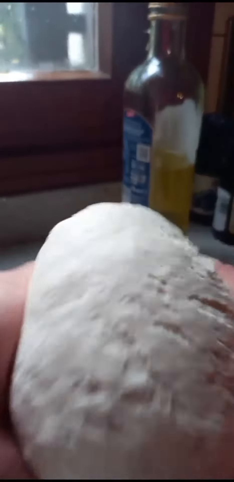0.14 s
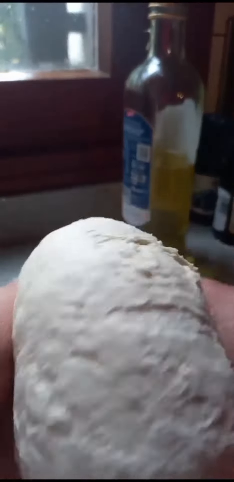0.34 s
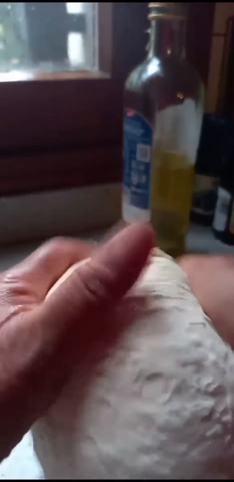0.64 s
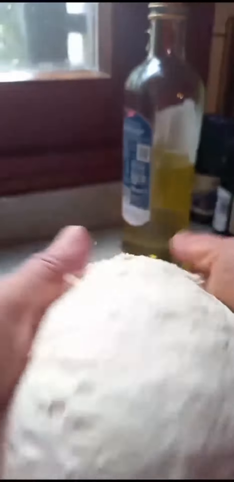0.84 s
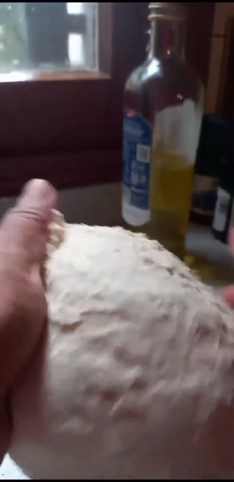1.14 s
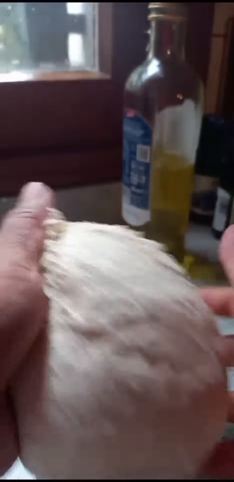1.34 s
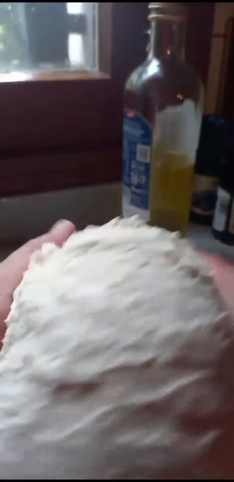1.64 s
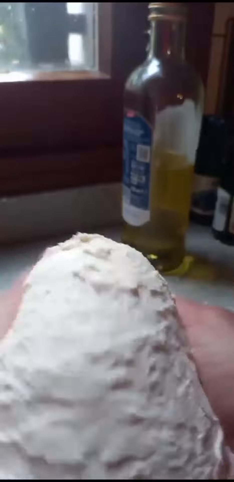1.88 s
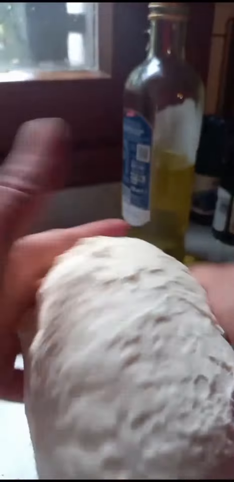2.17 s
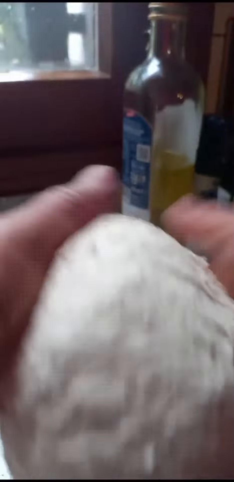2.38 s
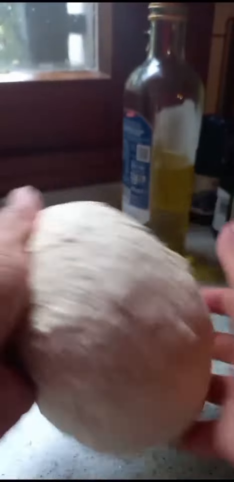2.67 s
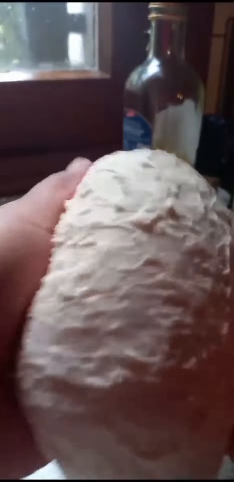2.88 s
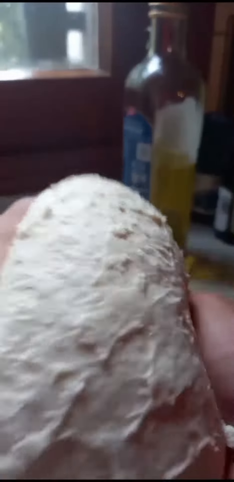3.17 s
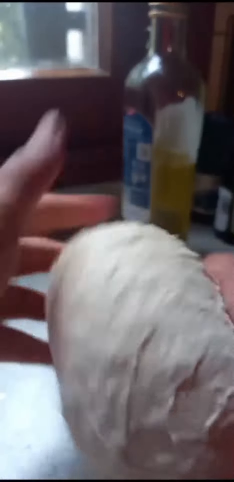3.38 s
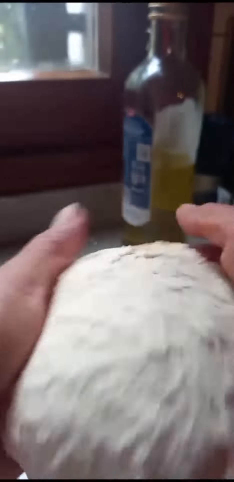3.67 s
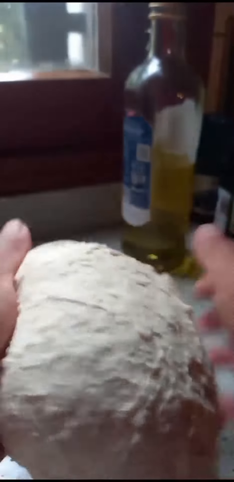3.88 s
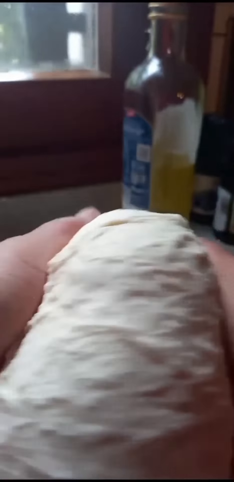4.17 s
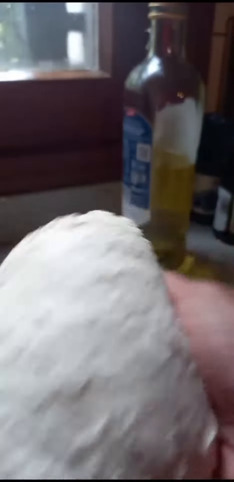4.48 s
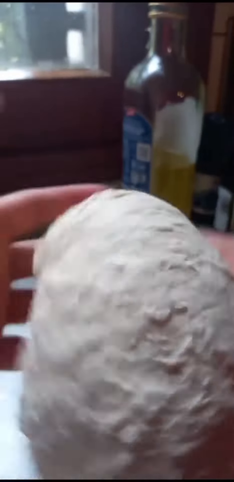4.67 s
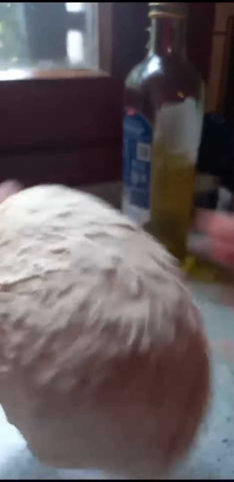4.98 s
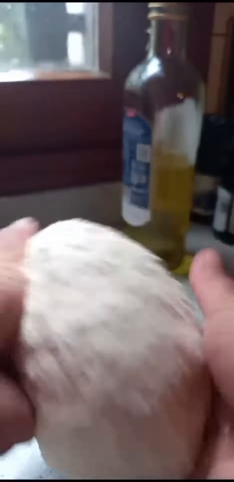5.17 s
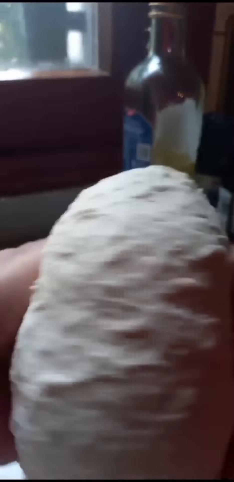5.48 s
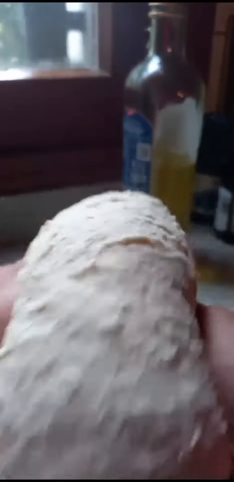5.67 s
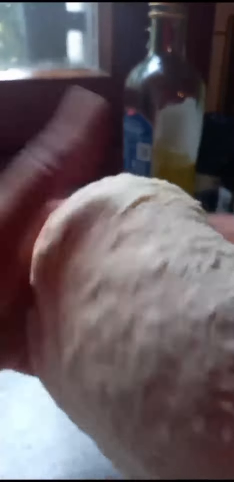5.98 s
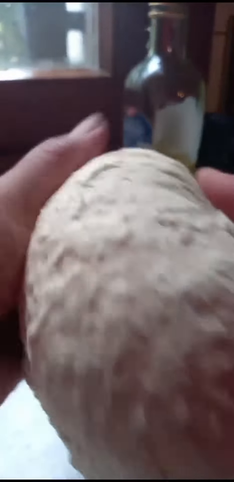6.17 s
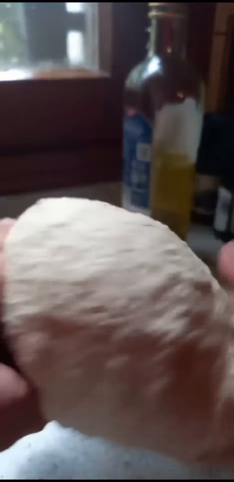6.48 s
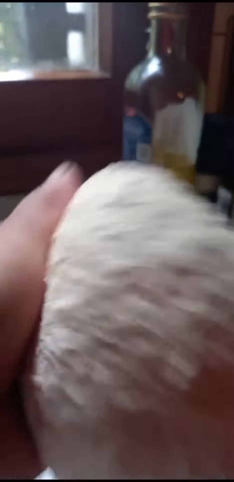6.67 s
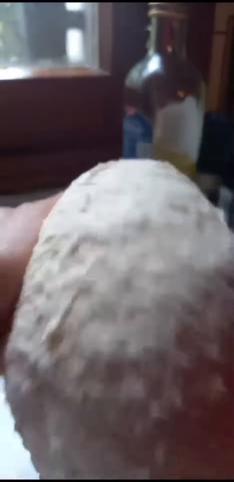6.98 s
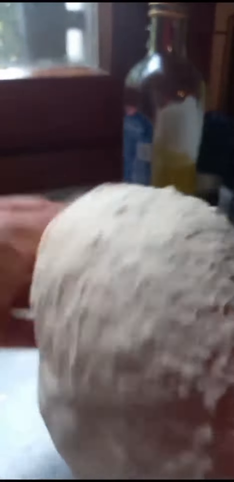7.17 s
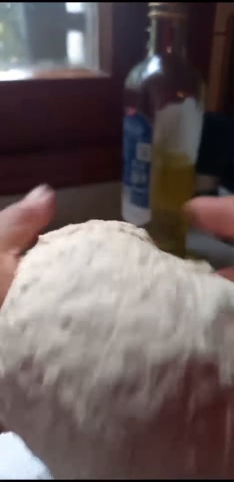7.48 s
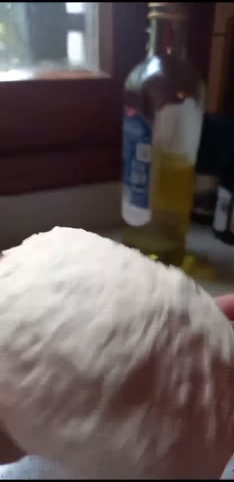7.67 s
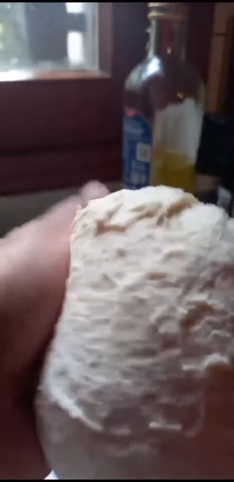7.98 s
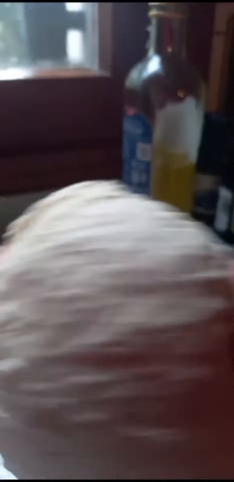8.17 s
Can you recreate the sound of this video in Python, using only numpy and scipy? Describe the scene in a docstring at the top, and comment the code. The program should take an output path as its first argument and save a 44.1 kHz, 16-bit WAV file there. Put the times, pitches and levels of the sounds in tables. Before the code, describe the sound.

Dough is patted and turned by hand in a small kitchen, making dull thumps, skin rubbing and moist little clicks.

```python
"""A small kitchen, close to the counter, where two hands turn and round a ball of dough.
Pats and pushes excite the modes of the hollow counter, which booms. Friction makes floury palms swish
and the twisting dough groan; sticky spots let go with ticks and rasps, and trapped air escapes in
an occasional smack. The room reverberates briefly over a quiet hiss, faint whines and a soft rush."""
import sys
import numpy as np
from scipy import signal
from scipy.fft import rfft, irfft
from scipy.io import wavfile
from scipy.ndimage import uniform_filter1d

SR = 44100
rng = np.random.default_rng(int(sys.argv[2]) if len(sys.argv) > 2 else 0)


def wav_out(sig):
    """Save sig, one row per channel (or a flat mono array), as 16-bit PCM at SR to the path in sys.argv[1]."""
    wavfile.write(sys.argv[1], SR, np.round(np.clip(np.atleast_2d(sig).T, -1, 1) * 32767).astype(np.int16))


N = 367779
TIME = np.arange(N) / SR


def gain_of(db):
    """Amplitude ratio of a level in decibels."""
    return 10 ** (np.asarray(db) / 20)

def unit_rms(x):
    """Normalisation to an overall rms of 1."""
    return x / np.sqrt(np.mean(x ** 2) + 1e-20)

def smoothed(x, size):
    """Low-pass filtering by two moving averages of size samples."""
    return uniform_filter1d(uniform_filter1d(x, size), size)

def steadied(x, size=3000):
    """Normalisation to a running rms of 1, which keeps the fast flutter."""
    return x / np.sqrt(abs(smoothed(x ** 2, size)) + 1e-20)

def curve_at(points, hz):
    """Interpolation on a log-frequency axis."""
    f, value = np.transpose(points)
    return np.interp(np.log(hz + 1), np.log(f), value)

def add(mix, s, sound):
    """Superposition of a sound on the mix, from time s."""
    part = mix[max(round(s * SR), 0):][:len(sound)]
    part += sound[:len(part)]

def through(x, response):
    """Convolution, cut to the length of the input."""
    return signal.oaconvolve(x, response)[:len(x)]

def pulse(spectrum, tilt_db=0, size=4096):
    """Minimum-phase pulse of unit energy, its spectrum tilted by tilt_db per octave."""
    hz = abs(np.fft.fftfreq(size, 1 / SR))
    db = curve_at(spectrum, hz) + tilt_db * np.log2(np.maximum(hz, 130) / 1000)
    log_gain = np.log(gain_of(np.maximum(db, -100)))
    shape = np.fft.ifft(np.exp(np.conj(signal.hilbert(log_gain)))).real[:size // 2]
    return shape / np.linalg.norm(shape)

def ring(modes, rise_s):
    """Free vibration: damped modes (f/Hz, level/dB, T60/s) with a gradual onset."""
    t = TIME[:SR // 2]
    partials = (gain_of(db - 60 * t / t60) * np.sin(2 * np.pi * hz * t) for hz, db, t60 in modes)
    return (1 - np.exp(-t / rise_s)) * sum(partials)

def grains(per_s, spread_db):
    """Shot noise: a random train of tiny slips of uneven size."""
    size = gain_of(spread_db * np.minimum(rng.exponential(1, N), 5))
    return unit_rms(size * rng.standard_normal(N) * (rng.random(N) < per_s / SR))

def burst(decay_s, size=600):
    """Finite contact time smears a click into a short burst with a nearly flat spectrum."""
    smear = rng.standard_normal(size) * np.exp(-TIME[:size] / decay_s)
    phase = np.angle(rfft(smear, 4 * size))
    return irfft(np.exp(1j * phase))[:size] * np.exp(-TIME[:size] / (4 * decay_s))

def swell(s, db, rise_s, fall_s, roundness):
    """Envelope peaking at s, 18.5 dB down rise_s before and fall_s after; roundness 1 is pointed."""
    away = np.maximum((s - TIME) / rise_s, (TIME - s) / fall_s)
    return gain_of(db - 18.5 * away ** roundness) * (away < 3)

def swells(rows, roundness, resting_db=-np.inf):
    """Incoherent addition: swells add their power to a resting level."""
    return np.sqrt(gain_of(resting_db) ** 2 + sum(swell(*row, roundness) ** 2 for row in rows))

def wavering(hz, width_hz):
    """Narrow-band noise: a fuzzy tone of rms 1 around a steady or moving pitch."""
    lowpass = signal.butter(2, width_hz / 2, fs=SR, output="sos")
    waver = signal.sosfilt(lowpass, rng.standard_normal(N) + 1j * rng.standard_normal(N))
    carrier = np.exp(2j * np.pi * np.cumsum(hz * np.ones(N)) / SR)
    return unit_rms((waver * carrier).real)


# Reverberation time of the kitchen: f/Hz, T60/s
REVERB_TIMES = [(100, 0.37), (400, 0.42), (1000, 0.53), (3000, 0.28), (8000, 0.18), (14000, 0.056)]
# Early reflections from counter, wall and window: delay/s, relative amplitude
REFLECTIONS = [(.0021, 0.81), (.0058, 0.29), (.0096, 0.22), (0.0162, 0.18)]
def kitchen(wet_db, echo_share):
    """Room impulse response: direct sound, reflections and a diffuse tail, shortest in the treble."""
    hz, t, noise = signal.stft(rng.standard_normal(SR // 2), SR, nperseg=256)
    decay = gain_of(-60 * t / curve_at(REVERB_TIMES, hz)[:, None])
    tail = signal.istft(noise * decay, SR, nperseg=256)[1][:SR // 2]
    tail *= 1 - np.exp(-TIME[:len(tail)] / 0.0003)
    response = gain_of(wet_db) * tail / np.linalg.norm(tail)
    response[0] += 1
    for delay, gain in REFLECTIONS:
        add(response, delay, [echo_share * gain])
    return response


# Modes of the hollow counter: f/Hz, relative level/dB, T60/s
COUNTER_MODES = [(102, -2, .33), (130, -7, .22), (151, -3, .26), (190, -6, .26), (233, -2, .3),
                 (274, -4, .32), (338, -5, .28), (362, 0, .3), (388, -2, .28), (428, -2, .3)]
def counter(ring_db, wet_db):
    """Resonance: an impulse on the counter excites its modes as well as the room."""
    return kitchen(wet_db, echo_share=0.14) + gain_of(ring_db) * ring(COUNTER_MODES, rise_s=0.00048)


# Spectrum of the hiss: f/Hz, relative level/dB
HISS_SPECTRUM = [(30, -1), (55, -0.5), (103, 0.5), (180, -7), (350, -2), (520, -12), (1100, -19.5),
                 (2000, -23), (2650, -20), (3500, -23), (5000, -25), (8600, -30.5), (10000, -27.5),
                 (14000, -23)]
def hiss():
    """Stationary broadband noise is heard as a quiet, even hiss."""
    return gain_of(-56) * unit_rms(through(rng.standard_normal(N), pulse(HISS_SPECTRUM)))


# Faint whines: start/s, end/s, f/Hz, bandwidth/Hz, level/dB
WHINE_BANDS = [(0, 2.6, 2772, 28, -77), (1.8, 2.9, 3333, 28, -79), (5.8, 6.9, 3320, 28, -79)]
def whines():
    """Noise confined to a narrow band is heard as a thin pitch; each fades in and out."""
    out = np.zeros(N)
    for start, end, hz, width_hz, db in WHINE_BANDS:
        whine = wavering(hz, width_hz)[:round((end - start) * SR)]
        add(out, start, gain_of(db) * whine * signal.windows.tukey(len(whine), .2))
    return out


# Soft pats: t/s, relative level/dB, tilt/(dB/octave), knock f/Hz, knock level/dB
PAT_EVENTS = [(.008, -20, 3, 406, -46), (.057, -21.5, 1.5, 440, -21.5), (.632, -27.5, 2.5, 378.3, -28),
              (1.165, -36.5, 0.5, 393, -57), (2.338, -14, 1.5, 369.6, -17), (2.439, -27, -7, 360, -31),
              (3.352, -21.5, 3.5, 410.4, -22.5), (4.751, -22, 2.5, 406, -24), (4.852, -26.5, -6, 344, -41),
              (5.794, -21, 6.5, 427, -28.5), (5.903, -28.5, -3, 374.7, -27), (6.044, -28, 3, 362, -33),
              (6.513, -22, -6, 290, -41), (6.577, -13, -4.5, 297, -30), (6.59, -16.5, -3.5, 388, -33)]
# Spectra of a soft palm's force and of its skin settling on dough: f/Hz, relative level/dB
PALM_SPECTRUM = [(30, -15), (75, -22), (105, -9.5), (140, 8), (250, -1.5), (425, -1), (490, -14),
                 (860, -16.5), (980, -31), (1600, -12), (3000, -67), (8000, -102)]
SKIN_SPECTRUM = [(300, -18), (600, 4), (900, 9.5), (1200, -7), (2000, -7.5), (5000, -24)]
def pats():
    """Impact excitation: a palm thumps and rustles, the counter booms, the board on it knocks."""
    out, contact = np.zeros(N), np.zeros(N)
    flesh = signal.windows.hann(55)  # soft contact is a low-pass filter
    thump_hz, lead_s = 248, .006
    phase_squared = (np.pi * thump_hz * (TIME[:round(2 * lead_s * SR)] - lead_s)) ** 2
    thump = gain_of(-0.5) * (1 - 2 * phase_squared) * np.exp(-phase_squared)  # the shove, heard directly
    t = TIME[:SR // 2]
    settling = (1 - np.exp(-t / 0.0047)) * np.exp(-t / 0.049)
    for s, db, tilt_db, knock_hz, knock_db in PAT_EVENTS:
        boom = through(counter(ring_db=-43.5, wet_db=5.5), pulse(PALM_SPECTRUM, tilt_db))
        boom = through(boom, flesh)
        boom *= gain_of(db + 23) / np.linalg.norm(boom)
        knock = ring([(knock_hz, 0, 0.19)], rise_s=0.0044)
        add(out, s - .008, gain_of(-19) * boom)  # the fingers arrive first
        add(out, s - lead_s, gain_of(db) * thump)
        add(out, s, boom)
        add(out, s + 0.00799, gain_of(knock_db) * knock)
        add(contact, s, gain_of(db - 37.5 + 2.1 * tilt_db) * settling)  # a brighter pat rustles more
    rustle = steadied(through(grains(per_s=4000, spread_db=2), pulse(SKIN_SPECTRUM)), size=600)
    return out + contact * rustle


# Pushes: peak t/s, relative boom level/dB, relative judder level/dB, rise/s, fall/s
PUSH_EVENTS = [(0.019, -26.5, -34.5, 0.3, 0.035), (.11, -32, -38, 0.15, 0.17), (.26, -59, -42, 0.11, 0.27),
               (.43, -41, -47, 0.089, 0.064), (.55, -53, -42, 0.14, 0.043), (.685, -39, -64, 0.051, 0.088),
               (.98, -47, -53, 0.49, 0.17), (1.36, -52.5, -45, 0.16, 0.21),
               (1.567, -37.5, -31.5, 0.078, 0.12), (1.725, -37, -33, 0.073, 0.14),
               (1.935, -46.5, -36.5, 0.1, 0.07), (2.015, -41, -37, 0.074, 0.12),
               (2.45, -30, -27.5, 0.15, 0.12), (2.55, -50, -38, 0.065, 0.18),
               (2.82, -50, -45.5, 0.038, 0.053), (3.03, -45, -42.5, 0.054, 0.16),
               (3.17, -39.5, -59, 0.095, 0.065), (3.42, -34, -43.5, 0.11, 0.11),
               (3.82, -46.5, -72, 0.14, 0.076), (4.3, -52, -67, 0.042, 0.12), (4.62, -42, -44, 0.12, 0.14),
               (4.88, -41, -36, 0.13, 0.14), (4.99, -38, -46, 0.063, 0.11), (5.32, -42, -61, 0.064, 0.21),
               (5.92, -33, -44.5, 0.17, 0.15), (6.08, -30, -38.5, 0.046, 0.094),
               (6.23, -31.5, -39.5, 0.06, 0.12), (6.309, -31, -40.5, 0.18, 0.16),
               (6.592, -26.5, -33.5, 0.082, .068), (6.669, -26, -34.5, 0.097, 0.14),
               (6.91, -45.5, -50.5, 0.27, 0.2), (7.11, -43, -48, 0.13, 0.058),
               (7.23, -42.5, -57, 0.056, 0.087), (7.47, -45.5, -60, 0.39, 0.57),
               (8.33, -44.5, -52.5, 0.11, 0.12)]
# Spectra of dough juddering, dough slipping and skin scuffing: f/Hz, relative level/dB
JUDDER_SPECTRUM = [(25, -13), (48, -23.5), (75, -17), (102, -2.5), (120, -7), (160, -23.5), (200, -19.5),
                   (500, -65.5)]
SLIP_SPECTRUM = [(60, -54.5), (105, -13), (135, -2.5), (200, 6), (360, 1), (425, -0.5), (480, -7.5),
                 (800, -23), (1050, -37.5), (3000, -46)]
SCUFF_SPECTRUM = [(250, -26), (520, -1.5), (850, -10), (1050, -12), (1800, -10), (4000, -54)]
def pushes(roundness=1.37):
    """Stick-slip friction: pushed dough judders and keeps the counter ringing while skin scuffs it."""
    judder = steadied(through(grains(per_s=300, spread_db=1), pulse(JUDDER_SPECTRUM)), size=1600)
    slips = through(grains(per_s=300, spread_db=2), pulse(SLIP_SPECTRUM))
    boom = steadied(through(slips, counter(ring_db=-45.5, wet_db=-1.5)), size=1800)
    scuff = steadied(through(grains(per_s=1100, spread_db=0), pulse(SCUFF_SPECTRUM)))
    # Between pushes the dough still rolls a little, unevenly.
    wander_db = 0.5 * unit_rms(smoothed(rng.standard_normal(N), size=2500))
    times, boom_db, judder_db, rises, falls = zip(*PUSH_EVENTS)
    weight = swells(zip(times, judder_db, rises, falls), roundness, resting_db=-60.5 + wander_db)
    force = swells(zip(times, boom_db, rises, falls), roundness, resting_db=-57 + wander_db)
    scuffing = force ** 0.52  # a heavy hand muffles the skin, so the scuff grows more slowly
    return gain_of(1) * judder * weight + gain_of(-1) * boom * force + gain_of(-46) * scuff * scuffing


def crackle(per_s, decay_cycles, pitches=16):
    """Damped oscillators: tiny blisters burst in the sticky dough, each ringing at its own pitch."""
    t, out = TIME[:500], np.zeros(N)
    for hz in np.geomspace(1900, 4600, pitches):
        blister = np.exp(-t * hz / decay_cycles) * np.sin(2 * np.pi * hz * t)
        out += unit_rms(through(grains(per_s / pitches, spread_db=-1), blister))
    return unit_rms(out)


def catches(per_s=45, decay_s=.012, depth=.3):
    """Amplitude modulation by stick-slip: skin catches, then tears free with a jerk."""
    onsets = 1. * (rng.random(N) < per_s / SR)
    jerks = through(onsets, np.exp(-TIME[:4000] / decay_s))
    return steadied(1 + depth * unit_rms(jerks - jerks.mean()), size=4000)


# Hand sliding over dough: peak t/s, level/dB, rise/s, fall/s, grip (0 floury to 1 tacky)
SLIDE_EVENTS = [(.425, -49.5, 0.17, 0.12, 0.37), (.535, -54, 0.058, 0.032, 0.24),
                (.965, -47, 0.14, 0.18, 0.23), (1.178, -48, 0.027, 0.045, .1),
                (1.52, -57, 0.11, 0.1, 0.039), (1.8, -45, 0.045, 0.085, 0.32),
                (1.966, -43, 0.1, 0.08, 0.27), (2.15, -51, 0.063, 0.047, 0.57),
                (2.495, -36, 0.073, 0.054, 0.12), (2.549, -43.5, 0.081, 0.057, 1),
                (2.905, -55, 0.24, 0.16, 0.059), (3.095, -53, 0.052, 0.065, .7),
                (3.18, -44.5, 0.067, 0.082, 0.31), (3.555, -53.5, 0.037, 0.052, 0.025),
                (3.791, -46, 0.18, 0.075, 0.04), (3.839, -41, 0.12, 0.055, 0.32),
                (4.14, -51.5, 0.1, 0.082, 0.028), (4.355, -51.5, 0.084, 0.15, 0.15),
                (4.505, -45, 0.037, 0.29, 0.24), (4.699, -41.5, 0.048, 0.026, 0.32),
                (4.935, -37.5, .11, 0.12, 0.2), (5.004, -43.5, 0.077, 0.035, 0.98),
                (5.334, -46, 0.056, 0.12, 0.11), (5.56, -52.5, 0.082, 0.12, 0.071),
                (5.674, -51.5, 0.088, 0.59, 0.26), (5.945, -43, 0.057, 0.05, 0.17),
                (6.03, -48, 0.063, 0.052, 0.041), (6.27, -47, 0.32, 0.16, 0.14),
                (6.325, -37, 0.031, 0.025, 0.26), (6.37, -41, 0.035, 0.047, 0.47),
                (6.595, -49, 0.016, 0.049, 0.029), (6.69, -54.5, 0.044, 0.5, 0.11),
                (7.105, -42.5, 0.13, 0.1, 0.11), (7.4, -50.5, 0.097, 0.31, 0.05),
                (7.565, -44, 0.099, 0.12, 0.18), (7.638, -50, 0.022, 0.04, 0.97),
                (7.971, -56, 0.2, 0.46, 0.11), (8.31, -48, 0.084, 0.069, 0.54)]
# Friction spectra of a light and of a firm touch: f/Hz, relative level/dB
BRUSH_SPECTRUM = [(710, -57), (1200, -10), (2050, -10.5), (2340, -6.5), (3420, -4.5), (4210, -13),
                  (4910, -5.5), (6340, -6), (12600, 3.5), (14000, 3.5)]
RUB_SPECTRUM = [(350, 2), (600, 2.5), (903, 4.5), (1070, -11.5), (1180, -1), (1430, -5.5), (1700, 3),
                (2040, -0.5), (2880, -3), (5640, -2), (8710, -9), (9680, 1), (12800, -3.5), (14000, -2)]
def slides():
    """Friction noise: skin hisses finely over flour; on a tacky patch it turns fuller and crackles."""
    powers = np.array([swell(*row[:4], roundness=1.275) for row in SLIDE_EVENTS]) ** 2
    total_power = powers.sum(0) + gain_of(-85) ** 2  # the hands never quite leave the dough
    grip = np.clip([row[-1] for row in SLIDE_EVENTS], 0, 1) @ powers / total_power
    light = unit_rms(through(grains(per_s=20000, spread_db=2.5), pulse(BRUSH_SPECTRUM)))
    firm = unit_rms(through(grains(per_s=6000, spread_db=1.1), pulse(RUB_SPECTRUM)))
    firm += gain_of(-9) * crackle(per_s=730, decay_cycles=1.9)
    stroke = (np.sqrt(1 - grip) * light + gain_of(1.5) * np.sqrt(grip) * firm) * catches()
    return np.sqrt(total_power) * unit_rms(through(stroke, kitchen(wet_db=-6.5, echo_share=0.033)))


# Tacky patches peeling off the palm: peak t/s, level/dB, rise and fall/s
PEEL_EVENTS = [(0.428, -47, 0.03), (0.953, -50.5, .03), (1.189, -51, 0.016), (1.791, -46.5, 0.015),
               (2.491, -41.5, 0.031), (3.1, -49.5, 0.013), (3.177, -47, 0.02), (3.79, -47.5, 0.024),
               (4.95, -49, 0.02), (4.964, -49, 0.014), (7.096, -51.5, .035)]
# Spectrum of their snaps: f/Hz, relative level/dB
PEEL_SPECTRUM = [(500, -46), (1400, -12), (2100, 5), (3000, 4.5), (4500, 3), (7000, -2), (14000, -25),
                 (16000, -22)]
def peels():
    """Adhesion fails bit by bit: tiny snaps and ringing blisters merge into a short, moist rasp."""
    snaps = unit_rms(through(grains(per_s=2500, spread_db=4.5), pulse(PEEL_SPECTRUM)))
    rasp = steadied(snaps + crackle(per_s=450, decay_cycles=7), size=900)
    pull = swells([(s, db, ramp_s, ramp_s) for s, db, ramp_s in PEEL_EVENTS], roundness=1)
    return through(rasp * pull, kitchen(wet_db=-8, echo_share=0.074))


# Sticky spots letting go: t/s, relative level/dB, tilt/(dB/octave)
TICK_EVENTS = [(.438, -28, -2), (.655, -36, -6), (.983, -31, -4), (1.165, -24.5, -1), (1.1897, -22.5, -3),
               (1.973, -24, -6), (2.4812, -23, -1), (2.4932, -21, -2), (2.5277, -22, -3), (2.58, -28, -4),
               (2.813, -38, -4), (3.7782, -27, -1), (3.831, -26, 0), (3.8472, -26, -1), (4.8983, -25, 1),
               (4.9282, -17.5, 5), (4.9533, -25, -1), (4.968, -23.5, 4), (6.366, -31, 0), (7.105, -30, -2)]
# Spectrum of one tick: f/Hz, relative level/dB
TICK_SPECTRUM = [(300, -16), (1200, -14), (2000, 1), (2650, 7), (3300, -1), (5000, -6), (9000, -12),
                 (14000, -12), (16000, -30)]
def ticks():
    """Adhesion fails all at once: tacky dough snaps free of the skin, close and dry."""
    out = np.zeros(N)
    for s, db, tilt_db in TICK_EVENTS:
        snap = through(kitchen(wet_db=-13, echo_share=.3), burst(decay_s=.0004))
        add(out, s, gain_of(db + 4) * through(snap, pulse(TICK_SPECTRUM, tilt_db)))
    return out


# Swells of a soft rush: peak t/s, level/dB, rise/s, fall/s
RUSH_SWELLS = [(1.93, -55, 0.31, 0.33), (5.08, -58.5, 0.54, 0.33), (8.08, -52, 0.26, 0.45)]
# Spectrum of the rush: f/Hz, relative level/dB
RUSH_SPECTRUM = [(250, -11.5), (500, 2), (880, 0), (1100, -11), (1500, -12.5), (2500, -23), (5000, -40)]
def rush():
    """Slow amplitude modulation of mid-range noise is heard as a rush that swells and fades."""
    noise = unit_rms(through(rng.standard_normal(N), pulse(RUSH_SPECTRUM)))
    return swells(RUSH_SWELLS, roundness=2.7) * noise


# Smacks, with relative levels: t/s, crack level/dB, tilt/(dB/octave), pop f/Hz, pop level/dB,
# thud level/dB
SMACK_EVENTS = [(1.982, -12.5, -6.5, 484, -17, -17), (4.544, -5, 5.5, 694, -10, -9),
                (4.5463, -1.5, 3, 686, -43, -42), (4.593, -22, -12, 328, -26, -23)]
# Spectrum of the escaping air: f/Hz, relative level/dB
CRACK_SPECTRUM = [(100, -63), (330, -39), (480, -36), (700, 3), (1100, -2), (1500, -12.5), (2010, -0.5),
                  (2400, -14), (2750, -8), (3200, -15), (4700, -18), (8000, -28), (14000, -33)]
# Modes of things nearby and of the landing dough: f/Hz, relative level/dB, T60/s
CLATTER_MODES = [(802, -26, .13), (847, -29, .1), (980, -33, .09), (1022, -31, .12), (1065, -31, .11),
                 (1223, -35, .13), (1709, -43, .11), (2012, -39, .075), (2780, -42, .08)]
LUMP_MODES = [(97, -16, 0.28), (157.6, 4, 0.049), (191, -11.5, 0.081), (237, -20.5, 0.3),
              (318.6, -6.5, 0.088)]
def smacks():
    """Cavity resonance: air cracks out and pops under the palm; things nearby ring, the dough lands."""
    out = np.zeros(N)
    room = kitchen(wet_db=-7.5, echo_share=.3)
    clatter = gain_of(-1) * ring(CLATTER_MODES, rise_s=0.0055)
    for s, crack_db, tilt_db, pop_hz, pop_db, thud_db in SMACK_EVENTS:
        crack = through(through(room, burst(decay_s=0.00093)), pulse(CRACK_SPECTRUM, tilt_db))
        add(out, s, gain_of(crack_db + 1) * (crack + clatter))
        add(out, s, gain_of(pop_db) * ring([(pop_hz, 0, .028)], rise_s=0.00046))
        add(out, s + 0.0016, gain_of(thud_db) * ring(LUMP_MODES, rise_s=0.0039))
    return out


# Twists of the dough: peak t/s, level/dB, rise/s, fall/s, f/Hz, glide/(octaves/s)
GROAN_EVENTS = [(5.33, -45.5, 0.17, 0.12, 370, -0.5), (6.3, -31.5, 0.082, 0.13, 365, -0.5),
                (6.473, -35.5, 0.028, .018, 370, 15), (6.535, -24, .04, 0.025, 337.6, 12.5),
                (6.609, -21.5, 0.019, 0.012, 378, -1.5), (7.43, -44.5, 0.085, 0.065, 375, 1)]
def groans():
    """Stick-slip oscillation: twisting dough chatters at a rough pitch, nearly steady or sweeping up."""
    out = np.zeros(N)
    for s, db, rise_s, fall_s, hz, glide in GROAN_EVENTS:
        pitch = hz * 2 ** np.clip(glide * (TIME - s), -1, 1)
        out += swell(s, db, rise_s, fall_s, roundness=1.37) * steadied(wavering(pitch, width_hz=43))
    return out


def scene():
    """Superposition of all sources; pats, smacks and ticks are high-passed, so they sound tight."""
    highpass = signal.butter(3, 80, "high", fs=SR, output="sos")
    blows = signal.sosfilt(highpass, pats() + smacks() + ticks())
    return (blows + pushes() + groans() + slides() + peels() + hiss() + whines() + rush())[None]


def record(dry):
    """Band limiting: the microphone sheds the deepest bass, and a low-pass cuts the highest treble."""
    highpass = signal.butter(6, 44, "high", fs=SR, output="sos")
    lowpass = signal.firwin(511, 14150, window=("kaiser", 9), fs=SR)
    return signal.oaconvolve(signal.sosfilt(highpass, dry), lowpass[None], "same")


dry = scene()
out = record(dry)
wav_out(out)
```